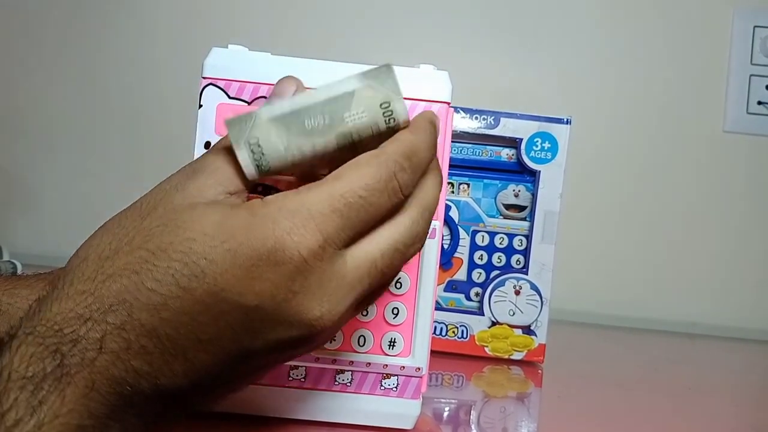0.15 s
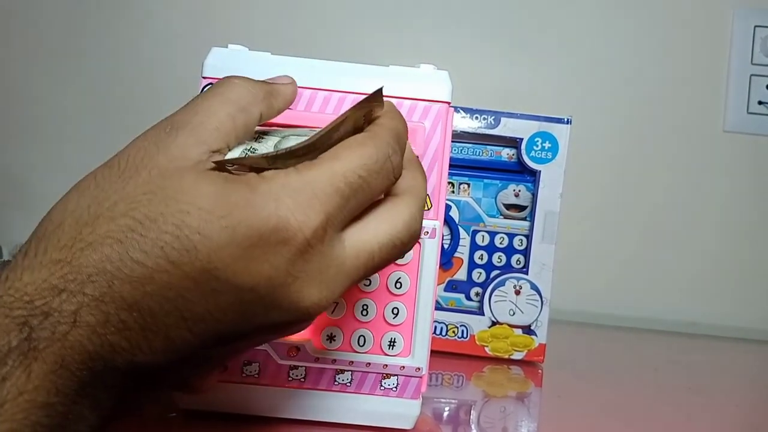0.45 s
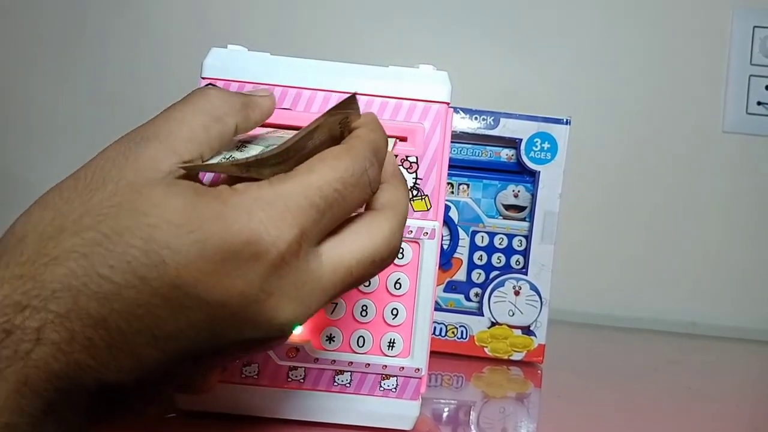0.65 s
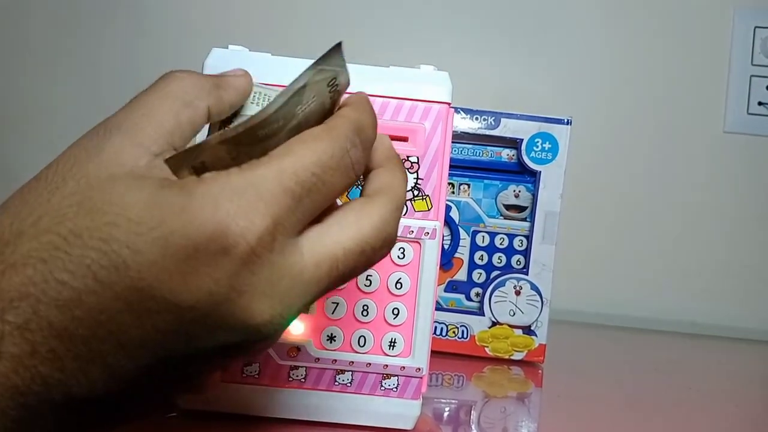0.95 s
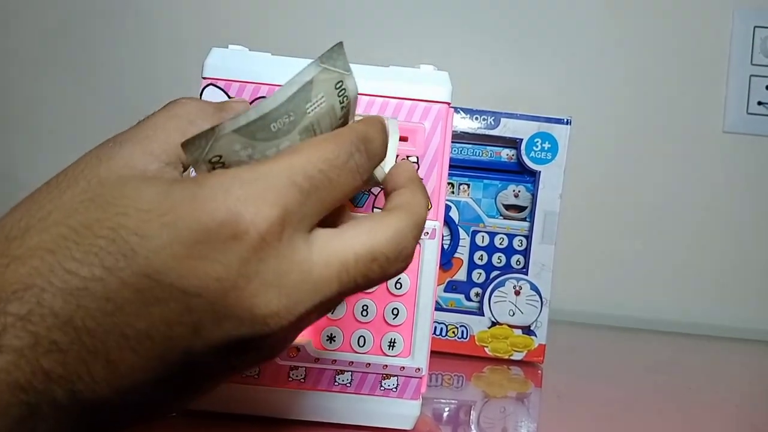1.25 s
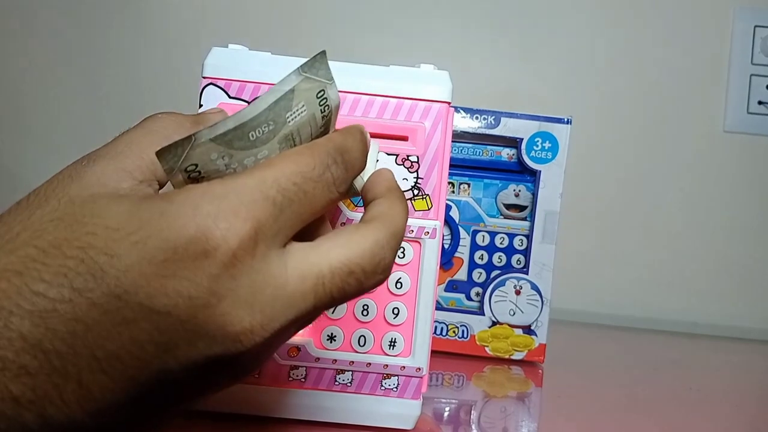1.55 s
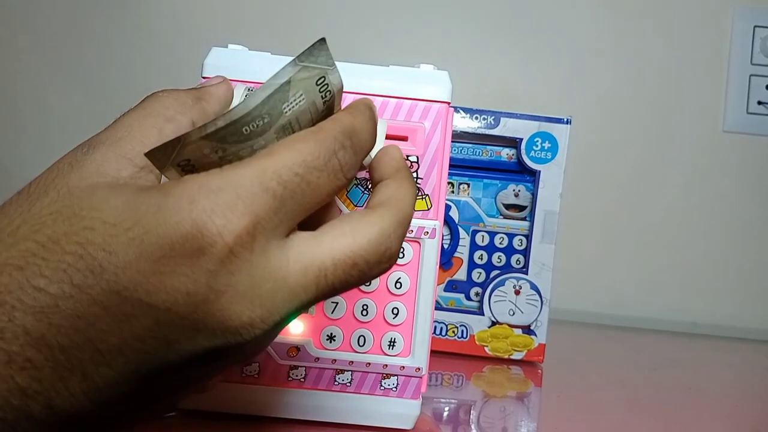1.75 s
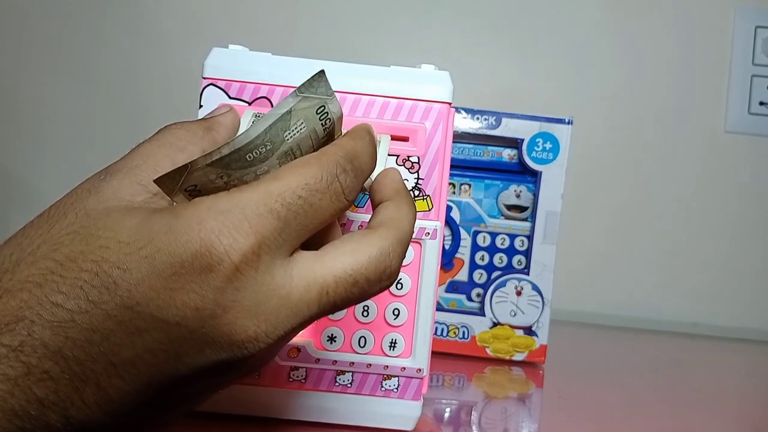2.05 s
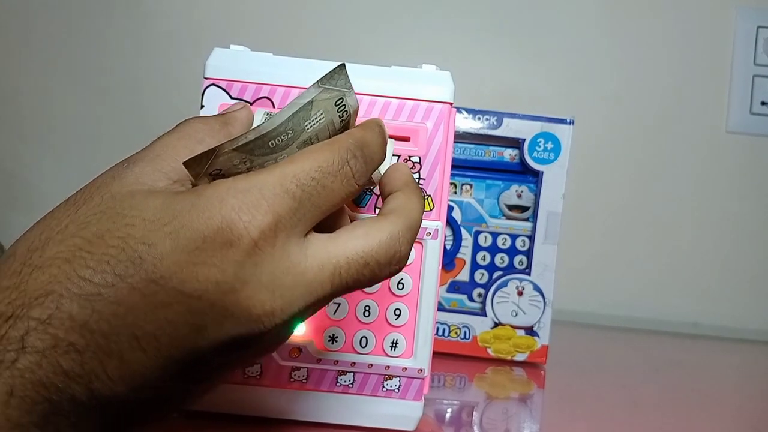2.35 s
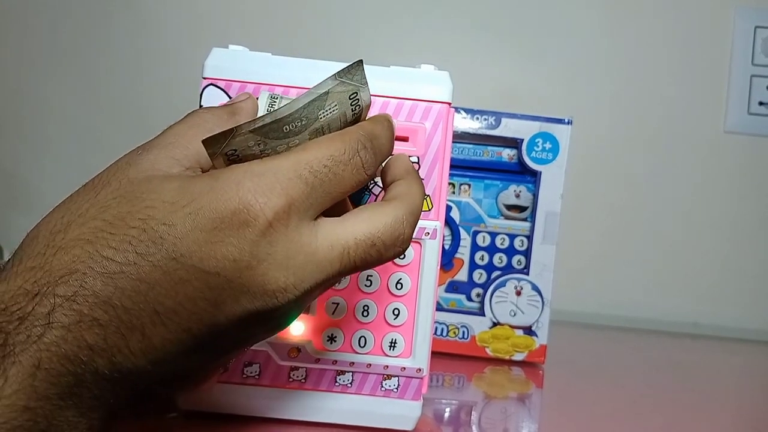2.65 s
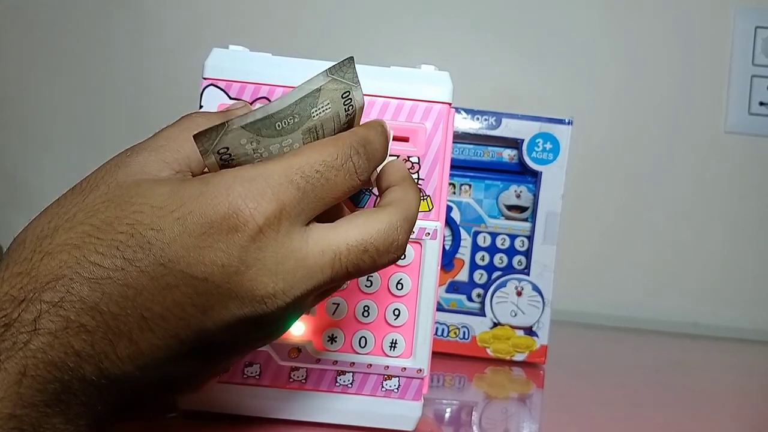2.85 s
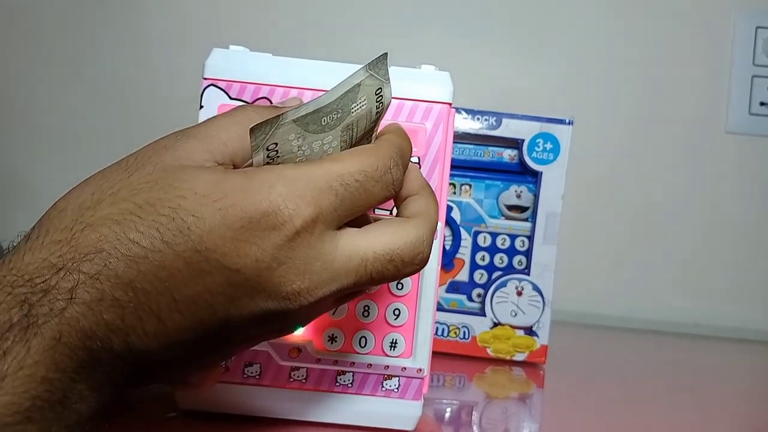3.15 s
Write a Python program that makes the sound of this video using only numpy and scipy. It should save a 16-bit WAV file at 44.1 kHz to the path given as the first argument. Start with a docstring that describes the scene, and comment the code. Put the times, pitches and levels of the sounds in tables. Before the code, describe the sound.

Brief rattling whir of a small toy motor, followed by faint paper clicks and crinkles.

```python
"""Toy bank takes a banknote

A small motor in a plastic toy bank drives rattling gears and a feed roller, then coasts to a stop.
A banknote catches on the roller with a short judder, then crinkles and ticks against the slot
as a hand shifts it. Close up, in a small bare room with a faint hum."""
import sys
import numpy as np
from scipy import signal
from scipy.fft import rfft, irfft
from scipy.io import wavfile

SR = 44100
rng = np.random.default_rng(int(sys.argv[2]) if len(sys.argv) > 2 else 0)


def transcribe(signal):
    """Save signal, clipped to [-1, 1], as a 16-bit WAV file at the path in sys.argv[1]."""
    frames = np.atleast_2d(signal).T
    limited = np.clip(frames, -1, 1)
    pcm = np.round(limited * 32767).astype(np.int16)
    wavfile.write(sys.argv[1], SR, pcm)


N = 145530
T = np.arange(N) / SR


def from_db(db):
    """Decibels to gain."""
    return 10 ** (np.asarray(db) / 20)


def unit_rms(x):
    """Normalise to an rms of 1."""
    return x / np.sqrt(np.mean(x ** 2) + 1e-20)


def automation(rows):
    """One lane per column after the time; the first and last values hold."""
    times, *lanes = np.transpose(rows)
    return [np.interp(T, times, lane) for lane in lanes]


def at_hz(points, hz):
    """Read a curve on a log-frequency axis."""
    f, value = np.transpose(points)
    return np.interp(np.log(hz + 1), np.log(f), value)


def eq(x, curve, resonances=()):
    """Minimum-phase EQ of unit energy: a broad curve with peaks and dips on top."""
    size = 8192
    hz = np.arange(size // 2 + 1) * SR / size
    peaks_db = sum(lift / (1 + (2 * (hz - f) / width) ** 2) for f, width, lift in resonances)
    cepstrum = irfft(np.log(from_db(at_hz(curve, hz) + peaks_db)))[:size // 2]
    cepstrum[1:] *= 2
    response = irfft(np.exp(rfft(cepstrum, size)))
    return signal.fftconvolve(x, response / np.linalg.norm(response))[:N]


def drift(per_s):
    """Random modulator, rms 1."""
    steps = rng.standard_normal(4000)
    return unit_rms(np.interp(T * per_s, np.arange(len(steps)), steps))


def grains(per_s, spread_db):
    """A cloud of tiny random clicks, rms 1."""
    sizes = from_db(spread_db * np.minimum(rng.exponential(1, N), 4)) * rng.choice([-1, 1], N)
    return unit_rms(sizes * (rng.random(N) < per_s / SR))


# Motor speed, running then coasting: t/s, f/Hz
MOTOR_SPEED = [(0, 154), (.065, 140.5), (.255, 140), (.3, 110), (.35, 74), (.43, 25)]
# Fader for gears and brushes together: t/s, level/dB
MOTOR_LEVEL = [(0, -23.5), (.11, -23), (.165, -21.5), (.188, -22), (.2, -23.5), (.255, -22), (.289, -28.5),
               (.299, -27.5), (.313, -42), (.33, -29.5), (.35, -44), (.395, -54), (.44, -82), (.5, -110)]
def motor():
    """Gears and brushes ride one spinning shaft, both biting harder once a turn."""
    speed, = automation(MOTOR_SPEED)
    level_db, = automation(MOTOR_LEVEL)
    turns = np.cumsum(speed) / SR
    swing = np.cos(2 * np.pi * turns)
    pace = speed / speed.max()
    return from_db(level_db) * (gears(turns, swing, pace) + brushes(swing, pace))


# Broad tone of the gear rattle: f/Hz, level/dB
GEAR_EQ = [(40, -64), (100, -32), (170, -14.5), (250, -11.5), (600, -6.5), (1500, -7.5), (2300, -4.5),
           (3000, -2), (3900, -6), (4400, -12.5), (6300, -24.5), (15000, -35)]
# Peaks and dips of the plastic case: f/Hz, width/Hz, gain/dB
CASE_RESONANCES = [(255, 30, 0), (390, 34, 6), (490, 54, -8), (591, 58, 9.5), (691, 60, 4), (767, 81, -8),
                   (869.6, 78, 5.5), (1190, 230, 7), (1496, 35, 12), (1737, 130, -1), (2080, 60, 9),
                   (2300, 180, 7), (2580, 60, -3), (2470, 15, -2.5), (3020, 120, 5), (3680, 35, 8.5),
                   (3820, 15, 10), (3890, 54, 3.5), (4310, 150, -8)]
# Rasp against the rattle, harder under load: t/s, level/dB
RASP_LEVEL = [(0, -8), (.13, -7), (.165, -4), (.19, -5), (.205, -11.5), (.25, -6.5), (.3, -4.5), (.33, -28),
              (.45, -23)]
# Narrow, biting band of the rasp: f/Hz, level/dB
RASP_EQ = [(1500, -45.5), (2750, -16), (2950, -4), (3170, -0.5), (3400, -15), (4500, -36.5), (9000, -61.5)]
def gears(turns, swing, pace, teeth=10, jitter_s=.00012):
    """Unevenly worn teeth strike as they mesh, ringing the case with a rasp on top."""
    meshes = np.flatnonzero(np.diff(np.floor(turns * teeth)))
    slop = (rng.standard_normal(len(meshes)) * jitter_s * SR).astype(int)
    accent_db = 2.5 * np.clip(rng.standard_normal(len(meshes)), -2, 1.5)
    wear_db = rng.uniform(-.88, 1, teeth)[np.arange(len(meshes)) % teeth]
    strikes = np.zeros(N)
    strikes[np.clip(meshes + slop, 0, N - 1)] = from_db(accent_db + wear_db)
    strikes *= np.where(rng.random(N) < .45, -1, 1)  # polarity flips turn whine into rattle
    strikes = unit_rms(strikes / np.sqrt(pace) * from_db(2.5 * swing))
    rasp_db, = automation(RASP_LEVEL)
    rasp = strikes * rng.choice([-1, 1], N) * from_db(rasp_db)
    return eq(strikes, GEAR_EQ, CASE_RESONANCES) + eq(rasp, RASP_EQ)


# Bright fizz of the brushes: f/Hz, level/dB
BRUSH_EQ = [(500, -24.5), (2500, -7.5), (4000, -1), (5700, 0.5), (6300, -10.5), (7100, -2), (7700, -8),
            (8600, 3.5), (9600, -8.5), (12200, -18.5), (14000, -9), (16000, -12.5)]
def brushes(swing, pace, db_per_octave=6.3):
    """The motor's brushes scratch, softer as the speed falls."""
    scratch = unit_rms(grains(per_s=7000, spread_db=4.5) * from_db(3 * swing))
    return eq(scratch, BRUSH_EQ) * from_db(-6 + db_per_octave * np.log2(pace))


# Partials of the shaft: multiple of the motor speed, level/dB
SHAFT_PARTIALS = [(1, -43), (2, -39), (3, -39.5), (4, -37.5), (5, -36), (6, -43)]
def shaft(waver_db=2.06, fade_db_per_octave=35.5):
    """The unbalanced shaft hums through the case and fades as it slows; its overtones waver more."""
    speed, = automation(MOTOR_SPEED)
    phase = 2 * np.pi * np.cumsum(speed) / SR
    tones = sum(from_db(db + waver_db * k ** .5 * drift(30)) * np.sin(round(k) * phase)
                for k, db in SHAFT_PARTIALS)
    cruise_hz = np.median(speed[:SR // 4])
    return tones * from_db(fade_db_per_octave * np.log2(speed / cruise_hz).clip(None, 0))


# Dark bed of room air: f/Hz, level/dB
AIR_EQ = [(20, -39), (35, -28), (55, -8), (78, -3.5), (110, -4.5), (160, -4), (210, -4.5), (300, -4.5),
          (380, -6.5), (570, -9.5), (1200, -15.5), (2400, -15), (3400, -21), (4600, -29), (6600, -40.5),
          (8500, -34.5), (10000, -42.5), (15800, -42)]
def room_tone(hum_hz=197):
    """Soft air and a faint wavering hum."""
    hum = unit_rms(np.sin(2 * np.pi * hum_hz * T) * from_db(-.5 * drift(15)))
    return from_db(-69.5) * eq(rng.standard_normal(N), AIR_EQ) + from_db(-78) * hum


# Knock cues of the coasting gears: t/s, level/dB, f/Hz
KNOCK_CUES = [(0.247, -26.5, 398.4), (.272, -34, 201), (.294, -34, 196), (0.327, -37.5, 243)]
def gear_knocks(rise_s=.0091):
    """The slack gear train gives soft low knocks that swell and die within a few cycles."""
    out = 0
    for start, db, hz in KNOCK_CUES:
        age = np.clip((T - start) / rise_s, 0, 40)
        out = out + from_db(db) * age * np.exp(1 - age) * np.sin(2 * np.pi * hz * (T - start))
    return out


# Faders for the sliding paper: t/s, body level/dB, treble level/dB
RUSTLE_LEVELS = [(.45, -68, -100), (.56, -55, -74), (.63, -63, -69), (.66, -77, -100.5), (.71, -71, -90),
                 (.74, -67, -76.5), (.85, -68.5, -81), (.92, -71.5, -85), (.99, -69.5, -79.5),
                 (1.12, -67.5, -89), (1.19, -82.5, -100), (1.3, -73.5, -97), (1.45, -77, -100),
                 (1.6, -78.5, -100), (1.66, -64.5, -85), (1.8, -79, -100), (1.92, -75, -90),
                 (2.1, -74.5, -80.5), (2.16, -76, -90), (2.25, -66.5, -79), (2.4, -82, -103.5),
                 (2.65, -78, -91), (2.79, -68, -86), (2.89, -90, -109), (3.06, -74.5, -86.5),
                 (3.3, -81, -91)]
# Body of the rustle: f/Hz, level/dB
RUSTLE_BODY_EQ = [(100, -7.5), (400, 1.5), (1200, -2.5), (2400, -0.5), (3400, -1), (4600, -10.5),
                  (8000, -25.5), (16000, -44)]
# Treble sheen of the rustle: f/Hz, level/dB
RUSTLE_TREBLE_EQ = [(500, -15.5), (3000, -1.5), (4200, 2), (5100, 2), (6400, -6.5), (7700, 2.5), (8900, 1),
                    (10000, -10.5), (12000, -11.5), (15500, -8.5)]
def rustle(flutter_db=1.5):
    """The note slides under the fingers in dense, fluttering grains of friction."""
    body_db, treble_db = automation(RUSTLE_LEVELS)
    friction = grains(per_s=2500, spread_db=3) * from_db(flutter_db * drift(45))
    body = eq(friction * from_db(body_db), RUSTLE_BODY_EQ)
    return body + eq(friction * from_db(treble_db), RUSTLE_TREBLE_EQ)


# Pitched judder of the caught note: t/s, level/dB
JUDDER_LEVEL = [(.503, -67.5), (.5095, -37.5), (.514, -30), (.517, -52), (.527, -46), (.539, -40),
                (.546, -54), (.56, -110)]
# Scrape of paper on the roller: t/s, level/dB
SCRAPE_LEVEL = [(.499, -82.5), (.505, -41), (.512, -40), (.516, -40), (.521, -45.5), (.527, -39.5),
                (.538, -53.5), (.546, -48), (.56, -100)]
# Tone of that scrape: f/Hz, level/dB
SCRAPE_EQ = [(60, -20), (250, 6.5), (700, 1), (1400, -4.5), (2250, 2.5), (2800, -1), (3600, -4),
             (4600, -13), (6500, -19), (8500, -9), (11500, -22.5), (15500, -20)]
# Low shudder of the case: t/s, level/dB
SHUDDER_LEVEL = [(.5, -100), (.54, -65), (.72, -73), (.77, -100)]
def note_catch(judder_hz=394, shudder_hz=51):
    """The note sticks and slips on the roller; the case shudders after it."""
    judder_db, = automation(JUDDER_LEVEL)
    scrape_db, = automation(SCRAPE_LEVEL)
    shudder_db, = automation(SHUDDER_LEVEL)
    phase = 2 * np.pi * np.cumsum(judder_hz * (1 + .011 * drift(200))) / SR
    judder = unit_rms(np.sin(phase) + from_db(-17) * np.sin(2 * phase)) * from_db(judder_db)
    scrape = eq(grains(per_s=2500, spread_db=0) * from_db(scrape_db), SCRAPE_EQ)
    shudder = unit_rms(np.sin(2 * np.pi * shudder_hz * T)) * from_db(shudder_db)
    return judder + scrape + shudder


# Click cues of the note's edge: t/s, level/dB, crisp layer gain/dB
CLICK_CUES = [(.591, -31.5, -11), (1.0333, -37, -23), (1.058, -29.5, -14.5), (1.110, -32.5, -22),
              (1.6187, -22, -29), (1.6341, -29, -17), (1.6819, -28, -21), (2.987, -36, -15.5)]
# A click heard through the case: f/Hz, level/dB
CLICK_EQ = [(100, -26), (600, -20), (1100, -4.5), (1700, -5), (2300, 7.5), (3200, -6), (4400, -19),
            (7000, -33), (16000, -52)]
# Crisp paper layer of clicks and crinkles: f/Hz, level/dB
CRISP_EQ = [(500, -11.5), (3500, 4.5), (5000, 1.5), (6500, -4.5), (8700, 3.5), (11500, -18), (15500, -9.5)]
def edge_clicks(chatter_db=-4, chatter_s=.0044):
    """The note's edge snaps on the plastic: a hard transient with a short chatter behind it."""
    body, crisp = np.zeros((2, N + SR))
    t = T[:SR // 10]
    for start, db, crisp_db in CLICK_CUES:
        snap = rng.standard_normal(len(t)) * np.exp(-t / chatter_s)
        snap *= from_db(chatter_db) / np.linalg.norm(snap)
        snap[0] = 1  # the transient
        span = slice(int(start * SR), int(start * SR) + len(t))
        body[span] += snap * from_db(db)
        crisp[span] += snap * from_db(db + crisp_db)
    return eq(body, CLICK_EQ) + eq(crisp, CRISP_EQ)


# Crinkle cues of the paper: t/s, level/dB, crisp layer gain/dB, attack/s
CRINKLE_CUES = [(0.606, -31.5, -11.5, 0.0081), (1.047, -30.5, -19, 0.01), (1.699, -42, -0.5, 0.0017),
                (1.939, -50, -1.5, .002), (2.076, -47, 0, .003), (2.092, -39, -6.5, 0.0072),
                (2.227, -48.5, 0, 0.0017), (2.470, -56.5, 7, 0.00092), (2.607, -49, 3.5, 0.0014),
                (2.722, -39.5, -15, 0.0026), (2.752, -36.5, -19, 0.0032), (2.773, -35.5, -11, 0.0029),
                (2.818, -52, 4, 0.00068), (2.834, -40, -8, 0.003), (2.977, -33.5, -18.5, 0.007)]
# Body of a crinkle: f/Hz, level/dB
CRINKLE_EQ = [(100, -21), (450, -6), (1000, -5), (1700, -19), (2400, 1), (3500, -5.5), (4600, -20),
              (7000, -34), (16000, -18)]
def crinkles():
    """The paper crinkles in puffs of grains that swell within milliseconds and die away."""
    body, crisp = 0, 0
    for start, db, crisp_db, attack_s in CRINKLE_CUES:
        age = np.clip((T - start) / attack_s, 0, 30)
        puff = age * np.exp(-age)
        puff *= from_db(db) / np.linalg.norm(puff)
        body = body + puff
        crisp = crisp + puff * from_db(crisp_db)
    fibres = grains(per_s=3200, spread_db=5.5)
    return eq(fibres * body, CRINKLE_EQ) + eq(fibres * crisp, CRISP_EQ)


# Faders for the hand on the case: t/s, rub level/dB, bump level/dB
HAND_LEVELS = [(1.48, -94.5, -100), (1.54, -71, -93), (1.62, -65.5, -83), (1.68, -71, -70),
               (1.78, -69, -79), (1.9, -75, -88.5), (2.05, -108, -97), (2.72, -98.5, -100),
               (2.78, -82, -83), (2.82, -80, -93), (2.84, -62.5, -88), (2.88, -85, -99), (3.3, -82, -100)]
# Boxy tone of the rub: f/Hz, level/dB
RUB_EQ = [(120, -32), (260, -6.5), (330, -6.5), (400, -2), (470, -12), (900, -28), (3000, -55)]
# Low end of the bumps: f/Hz, level/dB
BUMP_EQ = [(30, -27.5), (70, -0.5), (115, 0.5), (200, -21), (1000, -60.5)]
def handling():
    """The hand rubs and nudges the hollow case."""
    rub_db, bump_db = automation(HAND_LEVELS)
    rub, bump = rng.standard_normal((2, N))
    return eq(rub * from_db(rub_db), RUB_EQ) + eq(bump * from_db(bump_db), BUMP_EQ)


# Reverb time of the bare room: f/Hz, T60/s
ROOM_DECAY = [(100, .65), (500, 0.65), (2500, 0.42), (5000, 0.31), (14000, .36)]
def reverb(send, build_s=.012):
    """A diffuse tail that builds quickly and dies sooner in the treble."""
    t, tail = T[:SR], 0
    edges = np.geomspace(60, 18000, 10)
    for low, high in zip(edges, edges[1:]):
        bandpass = signal.butter(2, [low, high], "band", fs=SR, output="sos")
        band = signal.sosfilt(bandpass, rng.standard_normal(SR))
        t60 = at_hz(ROOM_DECAY, np.sqrt(low * high))
        tail = tail + band * np.exp(-np.log(1000) * t / t60)
    tail *= 1 - np.exp(-t / build_s)
    return signal.fftconvolve(send, tail / np.linalg.norm(tail))[:N]


def scene():
    """Mono mix: drive, snag and paper feed the reverb; shaft and hand stay dry."""
    drive = motor()
    snag = gear_knocks() + note_catch()
    paper = rustle() + edge_clicks() + crinkles()
    wet = reverb(from_db(-12.5) * drive + from_db(-19) * snag + from_db(-11) * paper)
    return (drive + shaft() + room_tone() + snag + paper + handling() + wet)[None]


def record(dry, low_cut_hz=30, high_cut_hz=15800):
    """The microphone loses the deepest bass; the top is cut steeply."""
    thin = signal.sosfilt(signal.butter(2, low_cut_hz, "high", fs=SR, output="sos"), dry)
    return signal.sosfilt(signal.ellip(12, .1, 80, high_cut_hz, fs=SR, output="sos"), thin)


dry = scene()
out = record(dry)
transcribe(out)
```